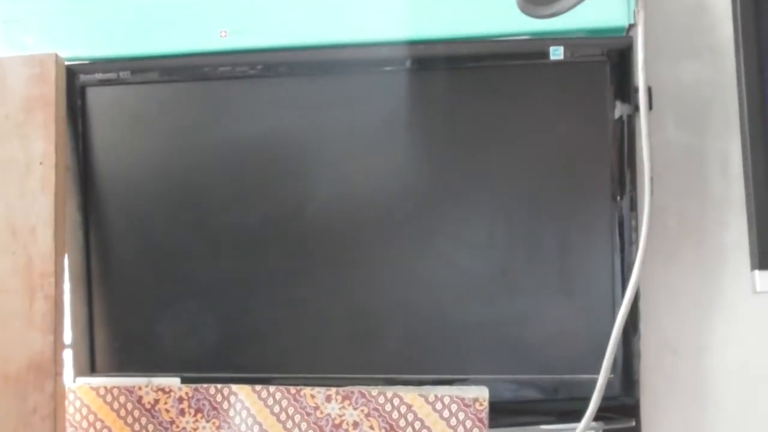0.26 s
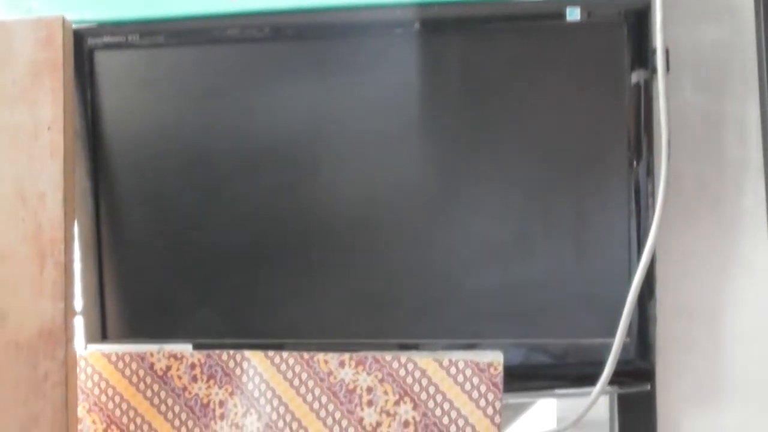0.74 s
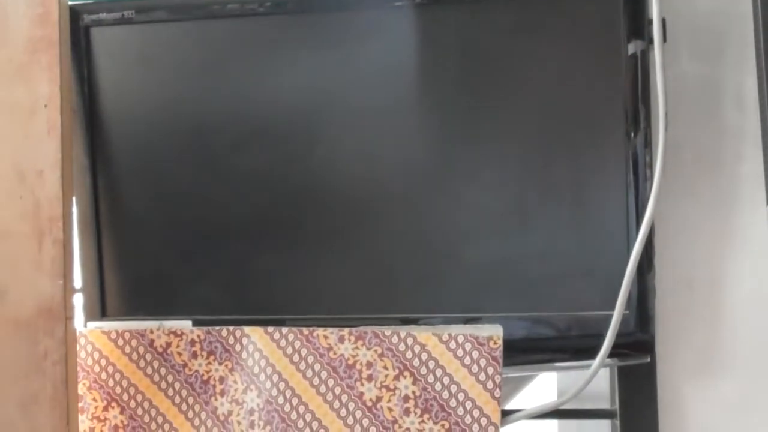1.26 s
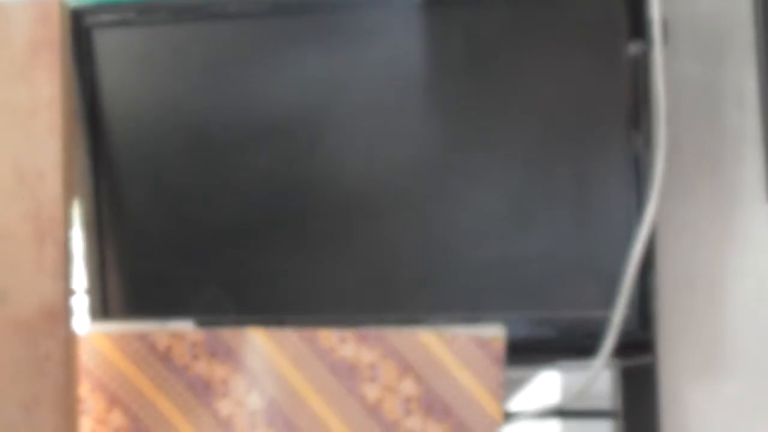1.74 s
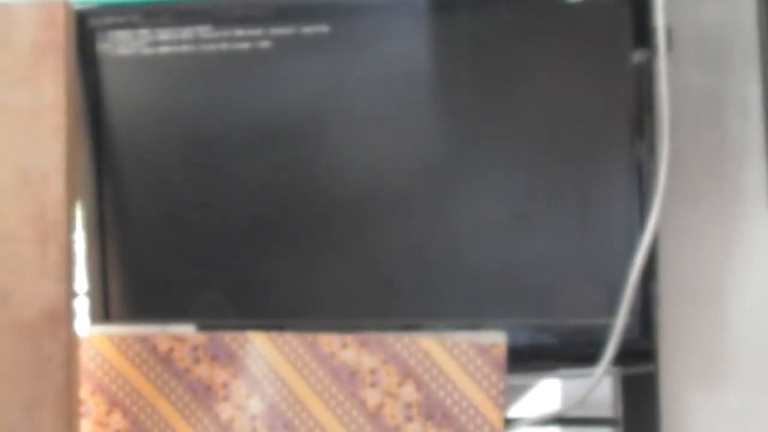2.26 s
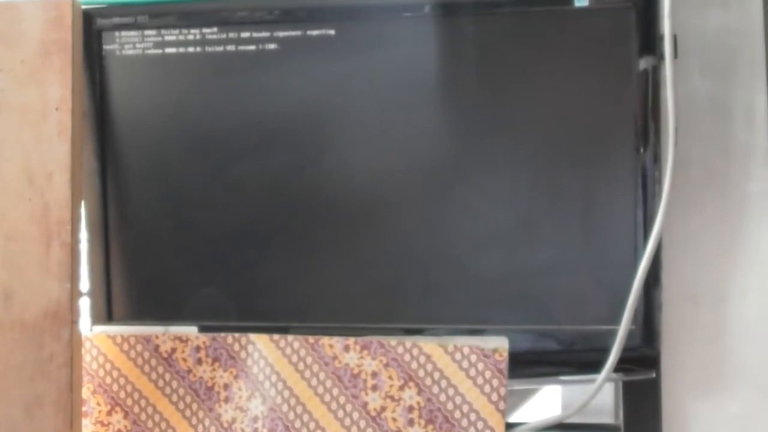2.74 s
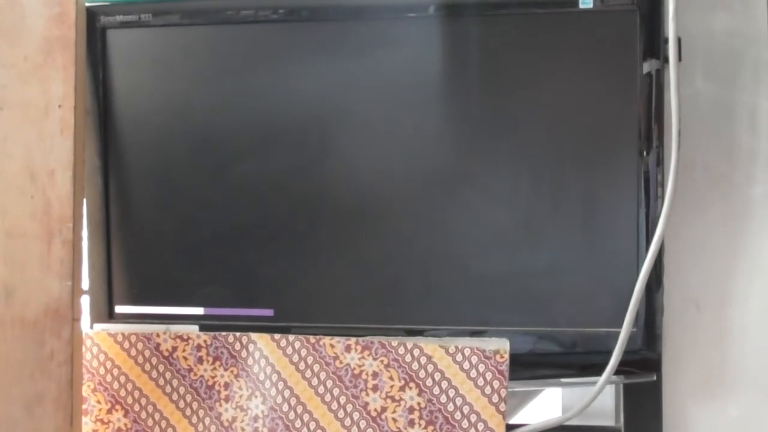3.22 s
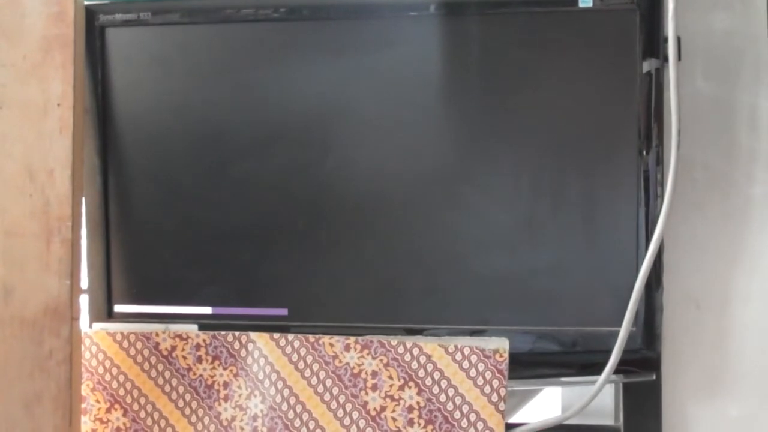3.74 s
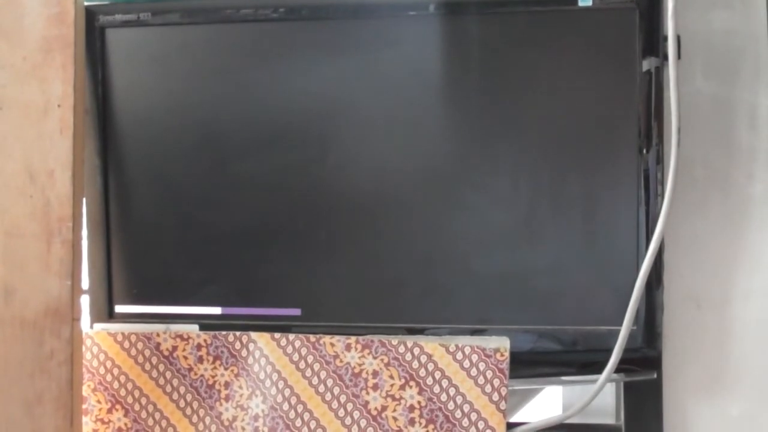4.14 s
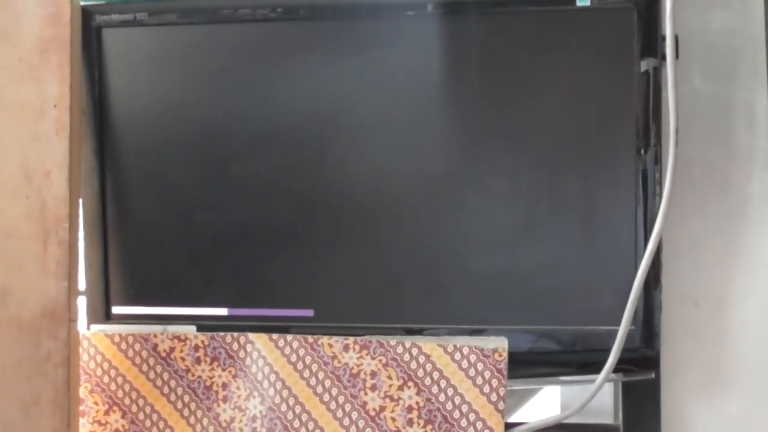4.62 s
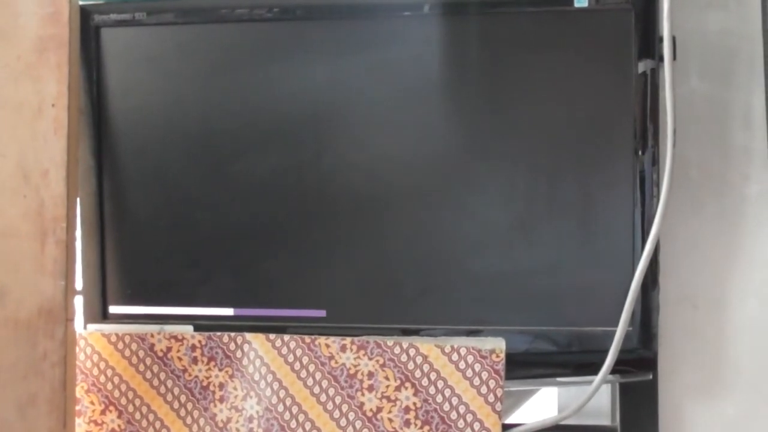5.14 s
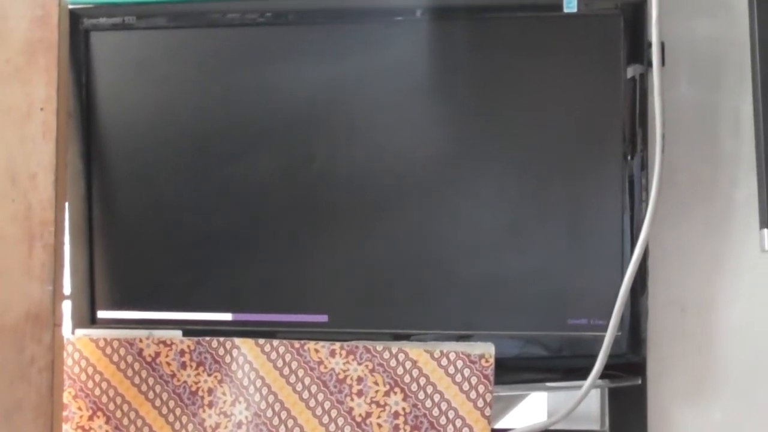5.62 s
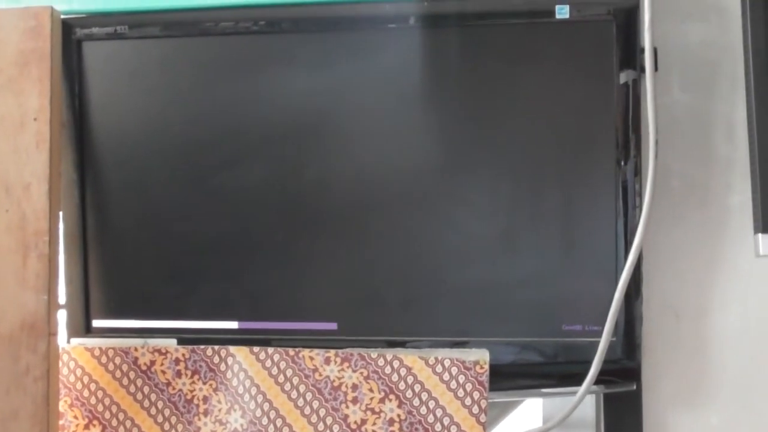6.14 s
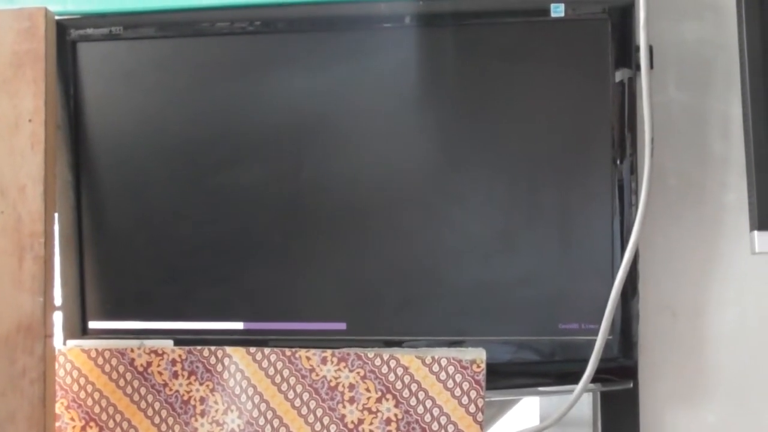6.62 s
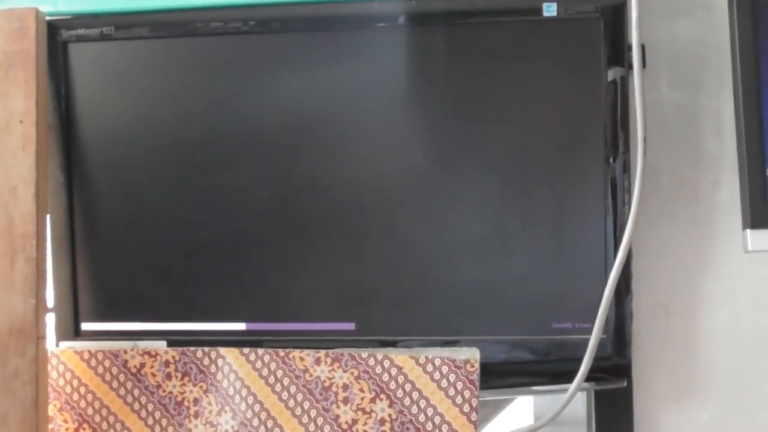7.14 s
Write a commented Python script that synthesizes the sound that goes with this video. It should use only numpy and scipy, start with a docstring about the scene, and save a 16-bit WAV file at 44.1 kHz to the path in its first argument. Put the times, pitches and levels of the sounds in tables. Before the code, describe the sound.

In a small room a desktop computer runs close to the microphones, its fans giving an even rush of air over a low, slightly wavering hum. Behind it, through the walls, a low rumble and a distant motorbike drone: the pitch climbs for over two seconds, swells, falls back, then cruises unevenly. A few faint plastic ticks and soft microphone hiss complete it.

```python
"""A small room in which a desktop computer runs: fans and power supply hum over an even rush of air.
Hum is a sum of wavering sines; rush, rumble and hiss are noise shaped by spectral density.
Through the walls come a low rumble and a distant motorbike, a sum of harmonics of its firing rate;
it speeds up, eases off and cruises on. A few faint ticks excite damped modes of a plastic shell.
The microphones add a soft hiss."""
import sys
import numpy as np
from scipy import signal
from scipy.fft import rfft, irfft, next_fast_len
from scipy.io import wavfile
from scipy.ndimage import uniform_filter1d

SR = 44100
rng = np.random.default_rng(int(sys.argv[2]) if len(sys.argv) > 2 else 0)


def store_wav(level_fs):
    """Save 16-bit WAV to argv[1]."""
    pcm = np.round(np.clip(np.atleast_2d(level_fs), -1, 1) * 32767)
    wavfile.write(sys.argv[1], SR, pcm.T.astype(np.int16))


N = 325502


def from_db(db):
    """Logarithmic level: 20 dB is a factor of ten in amplitude."""
    return 10 ** (np.asarray(db) / 20)


def in_time(rows):
    """Linear interpolation in time: each column of a curve at every sample."""
    s, *columns = np.transpose(rows)
    return [np.interp(np.arange(N) / SR, s, c) for c in columns]


def at_hz(points, hz):
    """Interpolation on a log-frequency axis."""
    known_hz, values = np.transpose(points)
    return np.interp(np.log(hz + 1), np.log(known_hz + 1), values)


def drift(rate):
    """Low-passed chance: noise of spread 1 that changes about rate times a second."""
    hz = np.arange(N // 2 + 1) * SR / N
    slow = irfft(rfft(rng.standard_normal(N)) / (1 + (hz / rate) ** 2), N)
    return slow / slow.std()


def stereo(mid, side):
    """Sum and difference: left and right from mid and side."""
    return np.array([mid + side, mid - side])


def tone(hz, side_db):
    """Quadrature stereo: standing waves bring a sine (mid rms 1) to two microphones out of phase."""
    phase = 2 * np.pi * (np.cumsum(hz) / SR + rng.random())
    mid = np.sin(phase)
    side = from_db(side_db) * np.cos(phase)
    return np.sqrt(2) * stereo(mid, side)


def noise(spectrum):
    """Spectral shaping: white noise weighted by a density, its stereo width varying with frequency."""
    # stereo width: (frequency [Hz], side minus mid [dB])
    width = [(25, -6), (80, -24), (130, -37), (200, -15.5), (300, -11.5), (550, -11), (750, -11.9),
             (1000, -9.5), (2000, -10), (3200, -11.5), (4300, -21), (6500, -68), (8200, -11), (9800, 0.5),
             (14000, -0.5)]
    size = next_fast_len(N)
    hz = np.arange(size // 2 + 1) * SR / size
    white = rfft(rng.standard_normal((2, size)))
    mid, side = white * from_db(at_hz(spectrum, hz)) * np.sqrt(SR / 2)
    side = side * from_db(at_hz(width, hz))
    return irfft(stereo(mid, side), size)[:, :N]


def air(flicker_db, treble_hz, pan_db):
    """Broadband flow noise: air rushes through grilles; its treble shifts as the microphone moves."""
    # air through the fans, before the level curves: (frequency [Hz], density [dB per Hz])
    air_spectrum = [(150, -83.5), (330, -68), (480, -70), (660, -70.5), (830, -73.5), (930, -78),
                    (1020, -76), (1150, -79.5), (1320, -78), (1440, -85), (1900, -85), (3300, -90.0),
                    (4300, -97), (5200, -103.9), (8000, -135)]
    # gain of the body: (time [s], level [dB])
    body_curve = [(0, 0.1), (2.4, -1.2), (5, 0.13), (7.3, -1.5)]
    # gain of the treble, before its flicker: (time [s], level [dB])
    treble_curve = [(0, -2), (0.6, .5), (1.8, 1.1), (3.9, 0), (4.5, .5), (5.7, -2.5), (7.3, 0)]
    body_db, = in_time(body_curve)
    treble_db, = in_time(treble_curve)
    rush = noise(air_spectrum)
    body = signal.sosfilt(signal.butter(1, treble_hz, fs=SR, output="sos"), rush)
    treble = rush - body
    heard = body * from_db(body_db) + treble * from_db(treble_db + flicker_db)
    return heard * from_db(pan_db * np.array([[.5], [-.5]]))


def hum(wander, flutter_db, level_db):
    """Periodic forcing: rotor, blade and mains tones, wavering in speed and strength by turbulence."""
    # tones, before flutter and balance: (frequency [Hz], level [dB rms], side minus mid [dB])
    steady_tones = [(61.7, -57, -23), (71.0, -53, -25), (100.0, -55, -23), (106.6, -39, -18),
                    (142.1, -51, -23), (250.3, -57, -7), (284.2, -56, -16), (342.3, -51.3, -27),
                    (509.5, -64, -8), (608.7, -68, 1), (623.2, -61.5, -9), (674.8, -56.5, -12),
                    (745.5, -64, -21), (796.6, -66, -15), (994.1, -65, -9), (1217.5, -69, -4),
                    (1339.2, -70.5, -21), (2397.5, -77.5, -18), (3530.9, -79.5, -21), (7246, -88, -25),
                    (13404, -92, -10)]
    out = np.zeros((2, N))
    speed, strength = drift(1.4), drift(1.0)
    # each tone reads the same drifts from its own starting point
    shifts = rng.integers(0, N, len(steady_tones))
    for (hz, tone_db, side_db), shift in zip(steady_tones, shifts):
        gain = from_db(level_db + tone_db + flutter_db * np.roll(strength, shift))
        wavering_hz = hz * (1 + wander * np.roll(speed, shift))
        out += gain * tone(wavering_hz, side_db)
    return out * from_db([[.4], [-.4]])   # left, right


def engine_levels():
    """Dominant partials: levels of the third and fourth orders, and the louder one's swing about its mean."""
    # third order, before throb and balance: (time [s], level [dB rms])
    third_curve = [(0.0, -52.5), (0.4, -54.5), (0.6, -39.5), (1.03, -38.5), (1.3, -57.0), (1.55, -34.5),
                   (2.12, -31.5), (2.21, -41.0), (2.32, -27.0), (2.5, -40.0), (2.9, -46.0), (3.12, -35.0),
                   (3.65, -49.5), (4.15, -38.0), (5.3, -47.5), (6.3, -56.5), (7.03, -32.5), (7.38, -40.5)]
    # fourth order, before balance: (time [s], level [dB rms])
    fourth_curve = [(0.0, -56.5), (0.17, -34.5), (0.3, -44.0), (0.98, -35.5), (1.4, -48.0), (2.1, -44.5),
                    (2.7, -59.0), (3.04, -35.5), (3.17, -51.5), (3.33, -35.5), (3.7, -38.5), (4.07, -32.0),
                    (4.2, -44.5), (4.42, -36.0), (5.4, -51.0), (6.0, -43.0), (6.6, -54.0), (7.38, -45.5)]
    third_db, = in_time(third_curve)
    fourth_db, = in_time(fourth_curve)
    engine_db = np.maximum(third_db, fourth_db)
    return third_db, fourth_db, engine_db - engine_db.mean()


def motorbike(third_db, fourth_db, swing_db, throb_db, weak_flutter_db, side_db):
    """Harmonic series of exhaust pulses: two orders carry the drone, reflections fade the others."""
    # engine speed: (time [s], firing rate [firings per s])
    speed_curve = [(0, 42), (0.5, 47.7), (1.42, 57.5), (1.8, 63.8), (2.36, 70), (2.6, 65), (3.02, 52.7),
                   (3.33, 48.3), (3.68, 47.3), (4.1, 50.2), (5.5, 53.8), (6.3, 51.7), (6.9, 51),
                   (7.38, 48.8)]
    # weak orders in the room's resonances, before swing, flutter and balance: (frequency [Hz], level [dB rms])
    room_response = [(100, -63), (130, -48.5), (200, -52.5), (250, -50), (290, -53), (325, -55.5),
                     (355, -54), (400, -60), (500, -66.5)]
    # weak orders: (multiple of the firing rate, ...)
    weak_orders = (2, 5, 6, 7, 8)
    weak_share = .42        # share of the swing in loudness that the weak orders follow
    steady_hz_per_s = 5.8   # the third order throbs most where the firing rate changes more slowly
    firing_hz, = in_time(speed_curve)
    change_hz_per_s = np.gradient(firing_hz) * SR
    steadiness = 1 / (1 + (change_hz_per_s / steady_hz_per_s) ** 2)
    cruising = uniform_filter1d(steadiness, size=SR // 5)
    orders = [(3, third_db + throb_db * cruising * drift(5)), (4, fourth_db)]
    for k in weak_orders:
        resonance_db = at_hz(room_response, k * firing_hz)
        orders.append((k, resonance_db + weak_share * swing_db + weak_flutter_db * drift(3.9)))
    drone = sum(from_db(db) * tone(k * firing_hz, side_db) for k, db in orders)
    return drone * from_db([[.5], [.9]])   # left, right


def rumble(swing_db):
    """Low-frequency noise: the rumble through the walls follows the engine's loudness slightly."""
    # low rumble, before swing and balance: (frequency [Hz], density [dB per Hz])
    rumble_spectrum = [(22, -94), (42, -64.5), (56, -73), (78, -59.5), (90, -64.5), (122, -56.5),
                       (138, -59.5), (152, -55), (170, -57.5), (205, -56.5), (250, -61.5), (295, -73),
                       (420, -80.5), (1000, -135)]
    rumble_share = .07   # share of the engine's swing that the rumble follows
    return noise(rumble_spectrum) * from_db(rumble_share * swing_db) * from_db([[-.4], [-1.4]])


def ticks(level_db, contact_hz):
    """Modal synthesis: each tick is an impulse that rings a few high damped modes of a plastic shell."""
    # impulses, before the common gain: (time [s], level [dB])
    tick_list = [(0.1505, -52), (4.9892, -45.5), (6.8877, -54)]
    # modes of the shell: (frequency [Hz], relative level [dB], 60 dB decay time [s])
    shell_modes = [(3740, -15, .014), (4700, -10, .014), (8000, -3, .009), (9300, -10, 0.0093),
                   (10400, -6, .005), (12200, -13, .004)]
    clicks, out = np.full(N, 1e-18), np.zeros(N)   # the tiny offset is inaudible
    for s, peak_db in tick_list:
        clicks[round(s * SR)] = from_db(peak_db + level_db)
    for hz, mode_db, t60 in shell_modes:
        radius = np.exp(-np.log(1000) / (t60 * SR))
        angle = 2 * np.pi * hz / SR
        resonator = [1, -2 * radius * np.cos(angle), radius * radius]
        out += from_db(mode_db) * signal.lfilter([0, np.sin(angle)], resonator, clicks)
    # the contact is not perfectly hard
    return signal.sosfilt(signal.butter(4, contact_hz, fs=SR, output="sos"), out)


def hiss(flicker_db):
    """Self-noise of the microphones: random high-frequency noise of slowly shifting level."""
    # hiss, before its gain: (frequency [Hz], density [dB per Hz])
    hiss_spectrum = [(4500, -125), (5600, -103.2), (6300, -102.6), (7300, -99.1), (8100, -100.3),
                     (9200, -105.0), (11000, -109.1), (15000, -110.8)]
    # gain of the hiss, before its flicker: (time [s], level [dB])
    hiss_curve = [(0, 1), (0.5, 2.1), (1.2, 0), (4.4, 0.2), (5.8, -0.8), (7.3, 0.2)]
    hiss_db, = in_time(hiss_curve)
    return noise(hiss_spectrum) * from_db(hiss_db + flicker_db)


def scene():
    """Superposition: the computer close by, the motorbike and rumble behind it, ticks and hiss."""
    third_db, fourth_db, swing_db = engine_levels()
    flicker_db = 0.5 * drift(24.0)   # the air's treble and the hiss flicker slightly together
    fans = air(flicker_db, treble_hz=1500, pan_db=-1.0)
    tones = hum(wander=0.00075, flutter_db=1.73, level_db=0.0)
    engine = motorbike(third_db, fourth_db, swing_db, throb_db=2.5, weak_flutter_db=2.0, side_db=-22)
    plastic = ticks(level_db=4.5, contact_hz=12500)
    return fans + tones + engine + rumble(swing_db) + plastic + hiss(flicker_db)


def record(dry):
    """Band limitation: a steep elliptic low-pass cuts the top."""
    cutoff_hz = 15720
    return signal.sosfilt(signal.ellip(12, .1, 80, cutoff_hz, fs=SR, output="sos"), dry)


dry = scene()
out = record(dry)
store_wav(out)
```